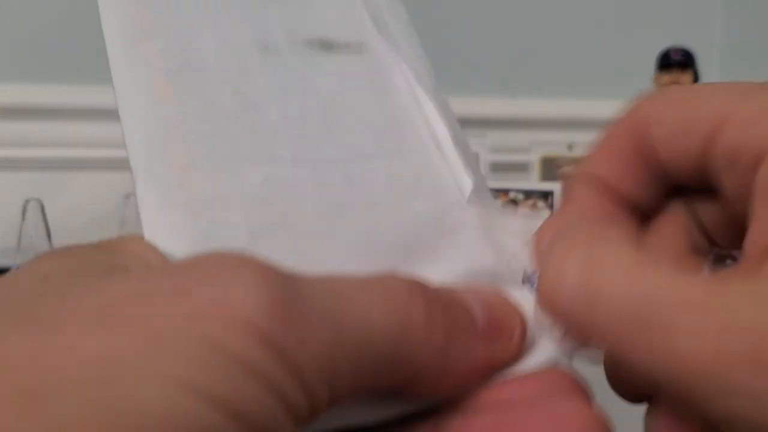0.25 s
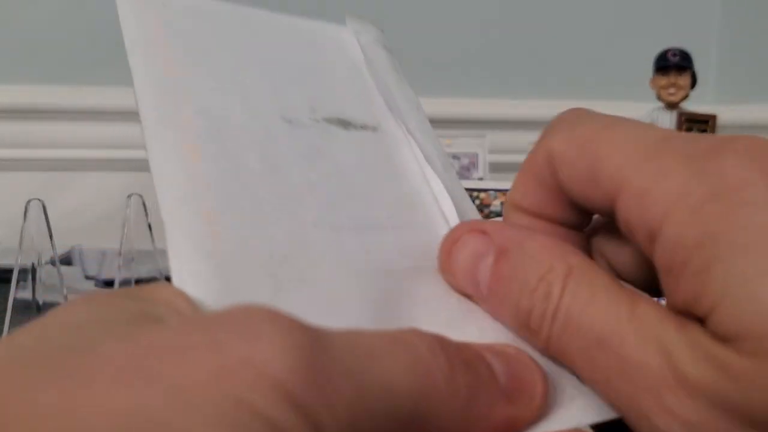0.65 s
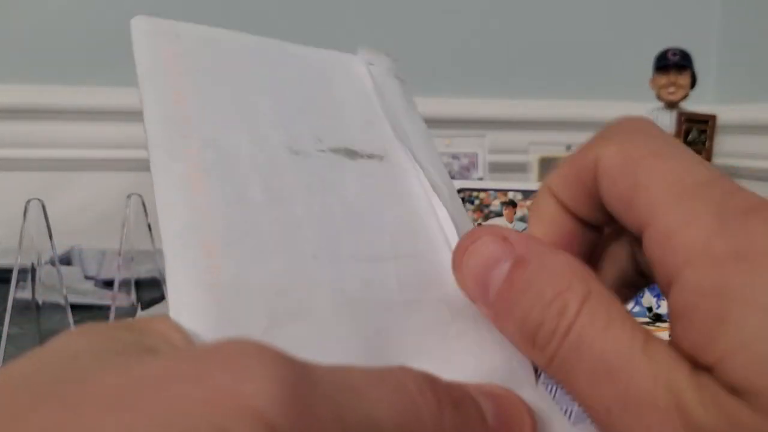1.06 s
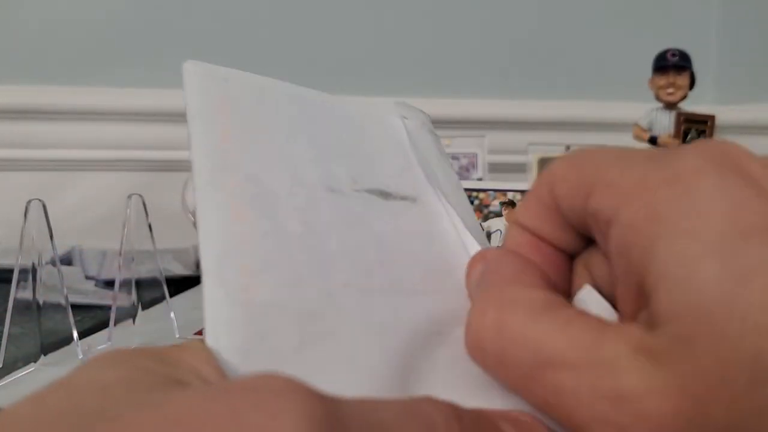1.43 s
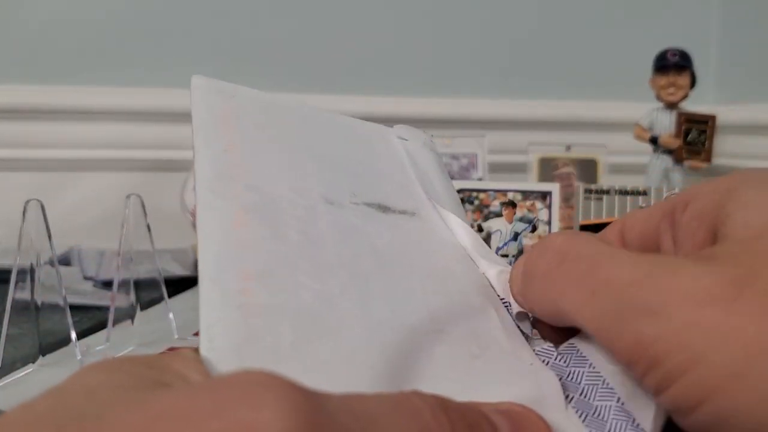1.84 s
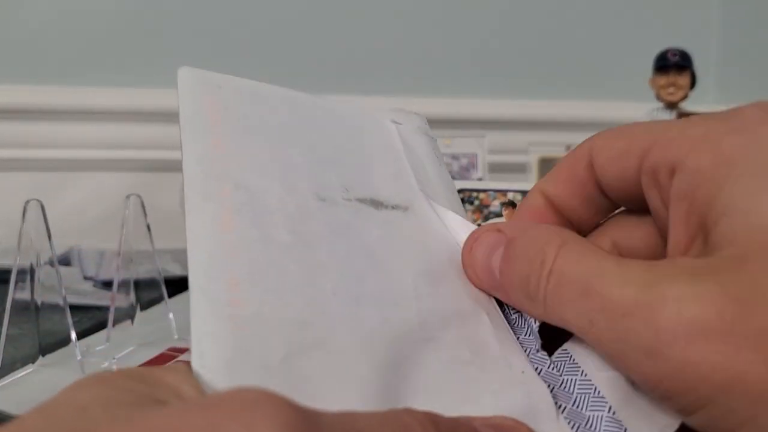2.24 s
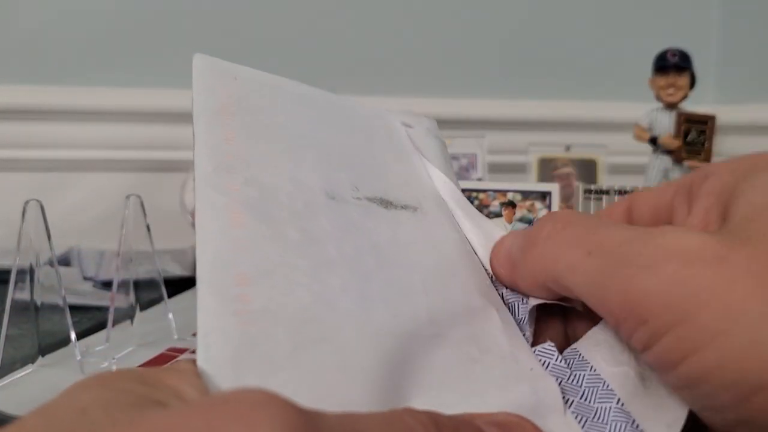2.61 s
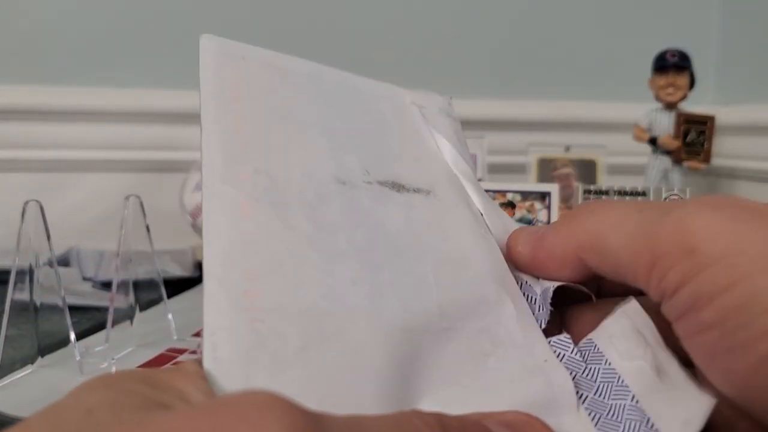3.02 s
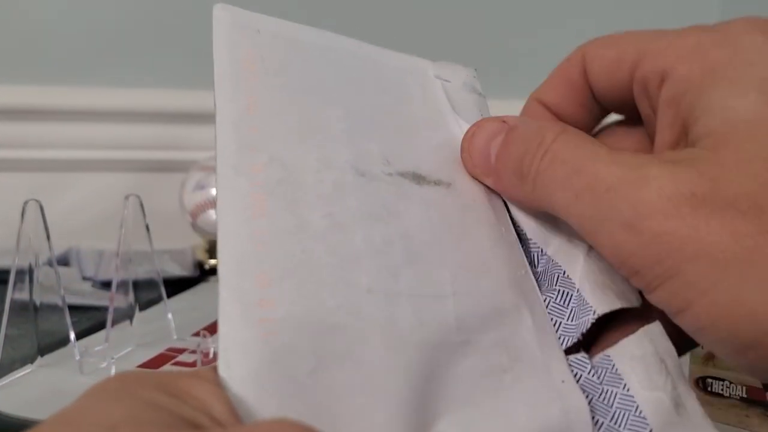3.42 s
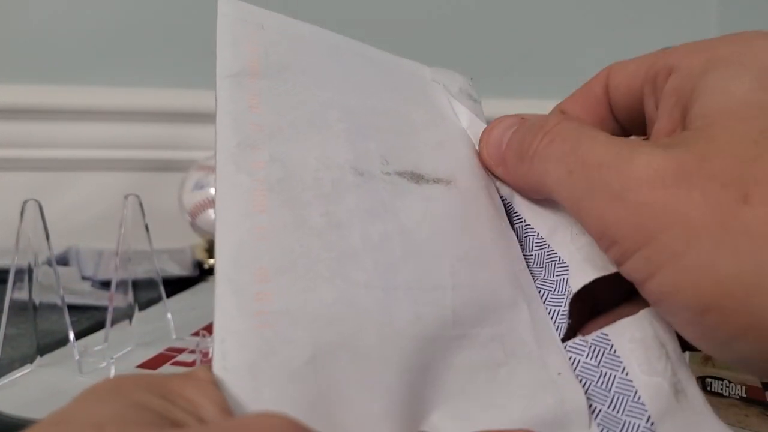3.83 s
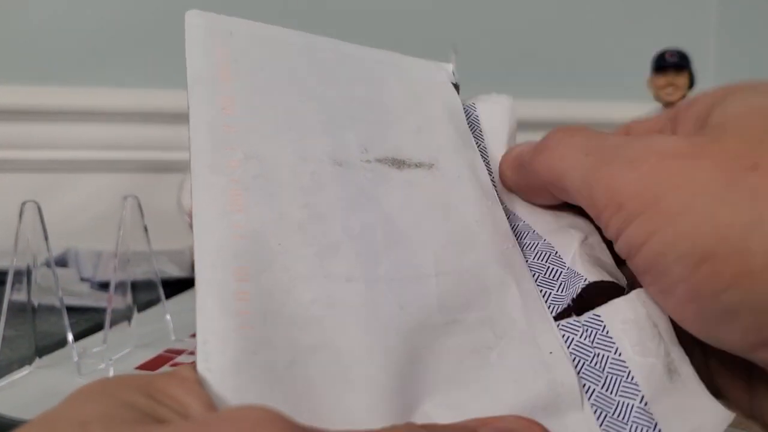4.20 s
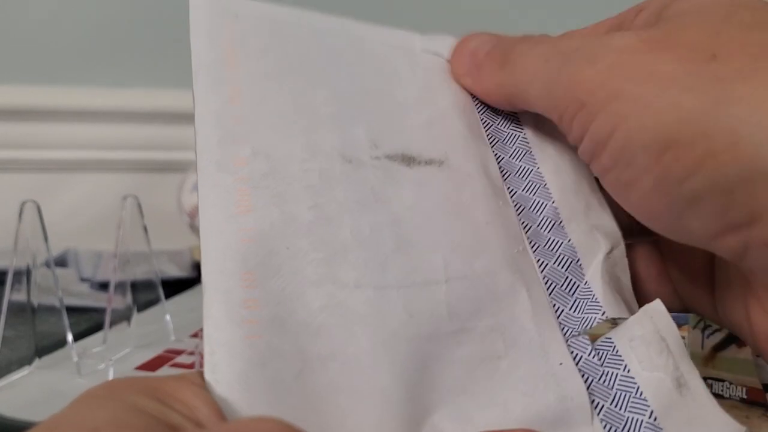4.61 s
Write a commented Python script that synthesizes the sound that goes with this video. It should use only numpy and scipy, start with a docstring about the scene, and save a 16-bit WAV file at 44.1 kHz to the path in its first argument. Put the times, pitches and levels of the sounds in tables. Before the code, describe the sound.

A thick paper envelope is torn open by hand very close to a stereo microphone in a small quiet room. A crackling rip comes early, then scattered crinkles and faint rubbing, further short rips near two and three seconds, and hard paper pops around four. Low puffs of air accompany the stronger jerks. A short room tail and soft, steady ventilation hum lie underneath.

```python
"""Hands tear a thick paper envelope open, close to a two-port microphone in a small quiet room.
Fibres rip in bursts of tiny cracks and fingers rub the sheet: noise kicks ring patches of paper.
Creases snap, each a short burst that rings flap, sheet and fibres; the moving envelope puffs low air.
Behind it, sparse reflections give the room a short tail, over a ventilation hum of shaped noise."""
import sys
import numpy as np
from scipy import signal
from scipy.io import wavfile
from scipy.ndimage import uniform_filter1d

SR = 44100
rng = np.random.default_rng(int(sys.argv[2]) if len(sys.argv) > 2 else 0)


def dump(signal):
    """Clip the signal to [-1, 1] and save it as 16-bit WAV at the path in sys.argv[1]."""
    limited = np.clip(np.atleast_2d(signal).T, -1, 1)
    pcm = np.round(limited * 32767).astype(np.int16)
    wavfile.write(sys.argv[1], SR, pcm)


N = 210004


def gain_of(db):
    """Amplitude factor for a level in dB."""
    return 10 ** (np.asarray(db) / 20)


def evened(x):
    """Scale to an rms of 1."""
    return x / np.sqrt(np.mean(x ** 2) + 1e-20)


def smoothed_twice(x, count):
    """Two moving averages in a row."""
    return uniform_filter1d(uniform_filter1d(x, size=count), size=count)


def read(points, hz):
    """Read a curve of (Hz, value) points on a logarithmic frequency axis."""
    f, value = np.transpose(points)
    return np.interp(np.log(hz + 1), np.log(f + 1), value)


def add(mix, s, sound):
    """Lay a sound into the mix from a moment in seconds."""
    part = mix[:, round(s * SR):][:, :sound.shape[1]]
    part += sound[:, :part.shape[1]]


def ring(x, hz, sharpness):
    """One damped resonance; the sharper it is, the longer it rings."""
    b, a = signal.iirpeak(min(hz, SR / 2.2), sharpness, SR)
    return signal.lfilter(b, a, x)


def band(x, lo_hz, hi_hz):
    """Keep the sound between two frequencies."""
    return signal.sosfilt(signal.butter(3, [lo_hz, hi_hz], "band", fs=SR, output="sos"), x)


def pair(z, same):
    """Left and right noise made alike by a share: 1 is identical, 0 unrelated."""
    same = np.clip(same, -1, 1)
    return np.array([z[0], same * z[0] + np.sqrt(1 - same ** 2) * z[1]])


def swells(rows):
    """Summed power of gestures that rise, hold and fall, one line for each level column."""
    ms, power = np.arange(N) / SR * 1000, 0
    for s, hold_ms, rise_ms, fall_ms, *db in rows:
        late = ms - 1000 * s
        rising = -late / max(rise_ms, 3)
        falling = (late - hold_ms) / max(fall_ms, 3)
        under_db = 20 * np.maximum(np.maximum(rising, falling), 0)
        power = power + gain_of(db)[:, None] ** 2 * gain_of(-under_db) ** 2
    return power


# Pulls and rubs of the hands, close to the microphone.
# Each row: end of the rise in seconds, hold in ms (below 0: the full level is not reached),
# rise and fall in ms for 20 dB (3 at least), then levels of fibre fizz, sheet crackle, flap flutter in dB.
STROKES = [(.113, 0, 120, 53, -53.5, -62, -70), (.183, 0, 18, 55, -51, -59, -69),
           (.281, 72, 6, 6, -37, -41.5, -51), (.321, 0.5, 81, 50, -30, -33, -42.5),
           (.4, 45, 30, 30, -60, -63, -62.5), (.458, 31, 6, 6, -47.5, -53, -61),
           (.476, 2, 48, 20, -45, -46.5, -56), (.605, 112, 12, 30, -59, -69.5, -72),
           (.748, 45, 6, 6, -50, -52.5, -66), (.758, 0, 40, 110, -53, -51, -61.5),
           (.87, 23, 6, 6, -42, -47.5, -67), (.885, 0, 55, 60, -45.5, -49.5, -56),
           (.922, 0, 45, 15, -62, -62, -44.5), (1.021, 20.5, 5.3, 6, -45, -40, -38.5),
           (1.033, 1, 90, 55, -45.5, -43, -43.5), (1.144, 0, 19, 17, -68, -55, -44.5),
           (1.17, 95, 24, 46, -57.5, -58, -64), (1.3, 57, 40, 65, -71, -71.5, -69.5),
           (1.482, 0, 76, 110, -64, -67, -64), (1.5, 87, 50, 12, -67.5, -85, -90),
           (1.603, 30, 6.7, 44, -67, -60, -57), (1.683, 21, 6, 6, -46, -48.5, -66),
           (1.724, 39, 6, 6, -36.5, -51, -55.5), (1.743, 1, 110, 66, -35, -43.5, -46.5),
           (1.865, 24, 32, 43, -55, -56, -54), (2.003, 16.5, 5.6, 5.5, -36, -43.5, -42),
           (2.012, -1, 22.5, 15, -38, -42, -36.5), (2.03, 2, 12, 73, -53, -72, -60),
           (2.223, -1, 18, 49, -56.5, -63.5, -57.5), (2.358, 9, 98, 35, -46, -52, -61),
           (2.381, -5, 12, 150, -63, -63.5, -62), (2.563, 0, 130, 12, -58, -70, -68),
           (2.572, 60, 5.4, 55, -50, -57, -57.5), (2.577, -4, 16, 24, -55, -52, -44.5),
           (2.72, 0, 62, 280, -63, -65, -62.5), (2.85, 75, 6, 6, -45, -49.5, -62),
           (2.902, 2.5, 52, 20, -36.5, -37, -47), (2.925, -2, 18, 48, -68, -47.5, -73),
           (2.99, 95, 100, 22, -61.5, -67, -79), (3.108, 24, 11, 6, -35.5, -37.5, -48.5),
           (3.12, 1, 28, 55, -37, -41, -44), (3.13, 58, 6, 6, -46, -47, -64),
           (3.192, 0.5, 10, 24, -38, -35, -35), (3.214, 0, 12, 70, -55, -62, -62),
           (3.416, 0, 18, 85, -55, -56.5, -56.5), (3.502, 30, 6, 6, -71, -53.5, -66),
           (3.515, -3, 80, 32, -71, -61, -58.5), (3.581, -1, 50, 90, -62.5, -64, -67.5),
           (3.826, 2, 130, 54, -56.5, -60.5, -65.5), (3.992, 86, 15, 28, -53.5, -56, -61),
           (4.103, 0, 10, 14, -55, -62, -30), (4.118, 0, 20, 117, -57, -49, -54),
           (4.326, 65, 31, 12, -55.5, -64, -64.5), (4.401, 1, 7.1, 15.5, -34, -38.5, -39),
           (4.42, 0, 12, 115, -58, -56.5, -62), (4.62, 24, 15, 73, -55, -63, -66),
           (4.66, 70, 22, 22, -63, -70, -75), (4.707, -1, 74, 15, -66, -45, -42),
           (4.76, 0, 25.5, 22, -38.5, -33.5, -33.5)]


def strokes():
    """Power of the hands' work on fibres, sheet and flap: the force that drives the paper."""
    return swells(STROKES)


def cracks(patch, flurry, grain, count=7):
    """Random cracks over a smooth slide, each ringing one of several patches of paper."""
    lo_hz, hi_hz, sharpness, per_s, spread_db, flurry_db, same = patch
    size_db = spread_db * np.minimum(rng.exponential(1, N), 5) + flurry_db * flurry
    starts = gain_of(size_db) * (rng.random(N) < per_s / SR)
    run = np.exp(-np.arange(24) / 5.1)  # a crack runs for a fraction of a millisecond
    hits = np.convolve(starts, run)[:N]
    # a steady pull frees energy at a steady rate
    hits = hits / np.sqrt(smoothed_twice(hits ** 2, 900) + 1e-9)
    kick = np.sqrt(grain * hits ** 2 + 1 - grain) * pair(rng.standard_normal((2, N)), same)
    which = rng.integers(0, count, N // 100 + 1).repeat(100)[:N]  # a patch drawn at random, held for 100 samples
    out = 0
    for k, hz in enumerate(np.geomspace(lo_hz, hi_hz, count)):
        share = grain * (which == k) + (1 - grain) / count  # a slide rubs all patches at once
        out = out + ring(kick * np.sqrt(share), hz, sharpness) / np.sqrt(hz)
    return evened(band(out, lo_hz * 0.75, min(hi_hz * 1.19, 20000)))


# Paper that the cracks ring: torn fibres, the sheet and the loose flap.
# Each row: lowest and highest resonance in Hz, sharpness (Q), cracks per second,
# spread of crack sizes in dB, flurry depth in dB, left-right likeness (0 to 1).
FIBRES = (5070, 19300, 1.93, 11000, 3.8, 1.3, 0.2)
SHEET = (1190, 4270, 3.2, 3900, 2.5, 2.3, 0.67)
FLAP = (361, 1046, 3.2, 1500, 2.1, 4.7, 0.85)
# The air inside the envelope: resonance in Hz, sharpness (Q), gain in dB.
POCKET = (681, 12.5, 0.8)
# The sheet turns in the hands before the microphone. Each row: time in seconds, top treble gain in dB,
# left over right in dB, ring of breaking fibres in Hz.
TURN = [(0, 8.5, -2, 12100), (.6, 1, -1, 10000), (1, 0, -2, 7960), (1.3, 2, -2, 9600),
        (1.8, 0, -4.5, 10100), (2.1, -1.5, -5, 8800), (2.5, 3, -5, 10300), (3, 3, -2, 9500),
        (3.6, 8.5, -1, 9900), (4.2, -3, -6, 9500), (4.76, -2, -2.5, 7600)]
RUB_DB, RIP_DB = -71.5, -46  # below the first level fingers slide smoothly, above the second nearly all is cracks


def tearing(power):
    """Pulls and rubs: fibres fizz, the sheet crackles, the flap flutters."""
    t = np.arange(N) / SR
    loud_db = 10 * np.log10(power[:2].sum(axis=0) + 1e-12)
    grain = np.clip((loud_db - RUB_DB) / (RIP_DB - RUB_DB), .06, .97)  # share of cracks against slide
    flurry = evened(smoothed_twice(rng.standard_normal(N), 60))  # cracks clump
    fizz, crackle, flutter = (np.sqrt(abs(p)) * cracks(patch, flurry, grain)
                              for patch, p in zip((FIBRES, SHEET, FLAP), power))
    s, top_db, pan_db, _ = np.transpose(TURN)
    top_gain = gain_of(np.interp(t, s, top_db))
    fizz = fizz + (top_gain - 1) * band(fizz, 8370, 22000)
    half_db = np.interp(t, s, pan_db) / 2
    pocket_hz, sharpness, pocket_db = POCKET
    flutter = flutter + gain_of(pocket_db) * ring(flutter, pocket_hz, sharpness)
    return (fizz + crackle) * gain_of([half_db, -half_db]) + flutter


def snap(s, flap_db, flap_hz, crack_db, crack_hz, tick_db, rise_ms, fall_ms, pan_db):
    """A crease gives way: a swelling burst of cracks rings the flap, the sheet and the fibres."""
    ms = np.arange(-300, 800) / SR * 1000
    rise_db, fall_db = 12 * ms / max(rise_ms, .1), -9 * ms / max(fall_ms, .2)
    burst = gain_of(np.where(ms < 0, rise_db, fall_db))
    z = rng.standard_normal((3, 2, len(ms))) * burst
    jolt = 2.56 * np.exp(-(ms / 0.04) ** 2)  # the fold breaks through with one sharp crack

    push = np.sin(np.pi * np.clip(ms / 1000 * flap_hz * 3.7 + .5, 0, 1))  # the sudden bulge of the flap
    flap = ring(push + 0.35 * pair(z[0], 0.99), flap_hz, 0.15)
    flap = ring(flap, flap_hz, 4.0)

    # a small crease rings one patch, a big one the whole sheet
    sharpness = np.clip(-.09 * (crack_db + 9), .7, 4.5)
    crack = ring(pair(z[1], 0.74) + jolt, crack_hz, 0.51)
    crack = ring(crack, crack_hz, sharpness) + 0.23 * crack

    tick_hz = np.interp(s, *np.transpose(TURN)[[0, -1]])
    tick = ring(band(pair(z[2], 0.4) + 0.6 * jolt, 5160, 18700), tick_hz, 0.97)

    # bring the loudest short stretch of each part to 1 (window in samples)
    flap, crack, tick = (part / np.sqrt(uniform_filter1d(part.mean(axis=0) ** 2, count).max())
                         for part, count in ((flap, 130), (crack, 66), (tick, 44)))
    treble = gain_of(crack_db) * crack + gain_of(tick_db) * tick
    # long waves reach both ports alike; the phone body shades only the treble
    sides = gain_of([[pan_db / 2], [-pan_db / 2]])
    return s - 300 / SR, gain_of(flap_db) * flap + treble * sides


# Small creases at random moments, standing above the stroke under way.
# The row: level above the stroke in dB, spread either way in dB, rise in ms for 12 dB, fall in ms for 9 dB.
SMALL = (6.7, 3, 2.3, 2.8)


def small_snaps(power, count=45):
    """Rows for small creases: random moments and patches, as strong as the stroke allows."""
    above_db, spread_db, rise_ms, fall_ms = SMALL
    for when, low, mid, a, b, c, side in rng.random((count, 7)):
        at = int(400 + when * (N - 400))
        stroke_db = 10 * np.log10(power[:, at] + 1e-12)
        tick_db, crack_db, flap_db = stroke_db + above_db + spread_db * (2 * np.array([a, b, c]) - 1)
        flap_hz = FLAP[0] * (FLAP[1] / FLAP[0]) ** low
        crack_hz = SHEET[0] * (SHEET[1] / SHEET[0]) ** mid
        yield at / SR, flap_db, flap_hz, crack_db, crack_hz, tick_db, rise_ms, fall_ms, 8 * side - 5


# Creases that buckle close to the microphone. Each row: peak in seconds, flap level in dB, flap ring in Hz,
# crack level in dB, crack ring in Hz, tick level in dB, rise in ms for 12 dB, fall in ms for 9 dB,
# left over right in dB.
SNAPS = [(.0303, -57, 360, -55, 2285, -55, 1.2, 2.4, -5), (.105, -68, 590, -58, 3700, -43, 0.64, 1, 0),
         (0.1112, -63, 590, -51, 3730, -32, .5, 0.81, 0), (.1281, -65, 440, -49.5, 2810, -58, 2.2, 2.4, 0),
         (0.183, -69, 310, -46, 3370, -31.5, .5, .5, -1), (0.1972, -66, 310, -43.5, 3620, -38, .7, 1.5, -2),
         (.206, -66, 840, -39, 3360, -30.5, .4, 0.47, -3),
         (0.2348, -33.5, 1050, -29, 1610, -44, 0.26, 2.1, 4),
         (.2432, -59, 1070, -39, 2210, -40, 0.94, 3, -2), (.2676, -49, 710, -56, 3270, -42, 2.6, 3.3, 4),
         (0.2774, -40, 540, -33, 2060, -38, 2.4, 4.1, 3), (.2845, -45, 700, -32.5, 2500, -35, .5, 1.5, 0),
         (0.3138, -36, 1090, -27, 1720, -35, 1.3, 4, -1.5),
         (.325, -31, 530, -23, 2230, -32.5, 0.49, 8.9, 4.5),
         (.3607, -33.5, 750, -37, 2040, -44, 3.9, 7.3, -8),
         (0.5104, -43, 570, -42.5, 1220, -64, 1.1, 1.6, 2), (.7856, -52, 1040, -33, 2030, -45, 1.2, 1.7, 1),
         (0.8904, -47, 630, -29, 2100, -31.5, 1.1, 1.6, -2.5),
         (.9149, -36.5, 660, -39, 1580, -51, 2.4, 3.1, 1),
         (.9211, -48, 720, -39.5, 3900, -32, 2.9, 3.1, -1),
         (1.0316, -24.5, 660, -27.5, 2620, -42, 4.1, 5.2, -2),
         (1.0593, -33, 720, -28, 2980, -34, 2, 2.3, 2), (1.08, -48, 590, -53, 3360, -53, 2.2, 2.3, -2),
         (1.1282, -61, 650, -54, 2550, -49, 2, 3, -1), (1.1539, -48, 640, -55, 2360, -60, 1.7, 2.1, -3),
         (1.1421, -45, 630, -42, 2900, -45, 1.2, 3.9, 1),
         (1.1748, -46.5, 660, -49, 3310, -48, .75, 2.2, -4),
         (1.3085, -58, 300, -62, 1840, -48.5, 2.2, 2.2, -6.5),
         (1.3576, -54.5, 880, -54, 1290, -52.5, 0.76, 1.3, 0),
         (1.482, -48.5, 1150, -48.5, 1400, -70, 0.76, 1.43, 3),
         (1.6011, -36.5, 720, -28.5, 1640, -29, 1.2, 1.3, -2),
         (1.6177, -43, 880, -37, 1570, -53, .5, 1.1, -1), (1.6423, -67, 440, -50, 1930, -44, 2.2, 1.7, -5),
         (1.6736, -42.5, 685, -39, 1740, -56, 2.2, 3.6, -2),
         (1.6948, -41.5, 603, -47, 3730, -28.5, 2, 2.6, -3.5),
         (1.7305, -38.5, 700, -36.5, 2470, -28, 3.9, 6.9, -1),
         (1.7463, -43, 534, -35.5, 2370, -25, 3.2, 4.8, 4),
         (1.7741, -51, 560, -57, 2010, -28, .6, 1.9, 3.5),
         (1.8016, -42.5, 710, -42.5, 1730, -50, 3.2, 3.2, 0),
         (1.8196, -43, 830, -40.5, 1430, -49, .6, .9, 1), (1.838, -70, 420, -45.5, 4210, -40, .6, 1, -1),
         (1.8646, -36, 700, -35.5, 1500, -55, 1, 2.2, -5),
         (1.8834, -66, 650, -57, 3400, -39.5, .7, 1.1, -4),
         (1.9658, -56, 310, -63, 2910, -48, 3.4, 1.3, -1),
         (1.9883, -41, 600, -29.5, 3260, -23.5, 0.38, 0.94, 2.5),
         (1.9967, -53, 490, -37.5, 4260, -39, 1.2, 2.3, -5),
         (2.008, -35.5, 694, -32.5, 2500, -26, 0.67, 2, -2),
         (2.014, -28.5, 710, -34, 1820, -32, 1.5, 1.6, 1),
         (2.0224, -42.5, 370, -40, 1720, -55, 1.7, .8, -9), (2.27, -52, 450, -57, 3640, -40.5, .5, 1.4, 0),
         (2.2795, -68, 380, -64, 2310, -46, 1.8, 2.7, 2), (2.3042, -59, 430, -45, 5200, -36, 1, .98, 1),
         (2.3148, -38, 610, -42.5, 1270, -42.5, 1.7, 5.3, 2),
         (2.3209, -53, 440, -49, 4840, -47, 1.6, 1.4, -2),
         (2.3504, -71, 560, -60, 3010, -32.5, 0.56, 1, -7),
         (2.357, -44.5, 580, -40, 2900, -26.5, 2.1, 1.8, 1),
         (2.431, -52, 334, -58, 1580, -65, 2.1, 1.9, -2),
         (2.4945, -74, 310, -59, 4740, -52.5, 2.6, 3.7, -2),
         (2.578, -49, 320, -37, 3870, -27, 0.74, 3.1, -3), (2.6009, -65, 480, -61, 4520, -37, 2.4, 3.2, 0),
         (2.6151, -49, 613, -33, 3400, -28, .66, 2.2, -4.5),
         (2.6222, -41, 557, -37.5, 3070, -49, 2.2, 4, 1), (2.6494, -47, 435, -53, 3020, -55, 2.2, 3.7, -10),
         (2.706, -46, 600, -60, 1540, -65, 1, 2.1, 2), (2.7298, -48, 616, -55, 1250, -55, 1, 2.4, 0),
         (2.7741, -61, 400, -61, 1590, -52, 1.5, 2, 0), (2.8259, -66, 780, -62, 1550, -54, 1, 2, -1),
         (2.8098, -67, 290, -64, 2830, -48, 3.1, 1, -1), (2.8464, -53, 990, -41.5, 1330, -44, .9, 1.4, 0),
         (2.852, -54, 1090, -58, 1910, -39, 1, 1.4, 3), (2.8746, -59, 1010, -41, 3280, -36, .34, .77, 9),
         (2.8985, -41.5, 1040, -32.5, 2960, -50, 1.9, 0.73, -4),
         (2.9047, -40, 625, -41, 1730, -31, 1.9, 4, -1), (2.9373, -65, 930, -38, 4000, -42, .52, 0.65, -4),
         (3.0247, -76, 460, -55.5, 2790, -53, 2.8, 3.3, -4),
         (3.1305, -49, 383, -42, 1590, -45, 2.2, 3.3, -2),
         (3.1447, -41.5, 530, -37, 3260, -42, 2.2, 3.4, -2),
         (3.1525, -58, 300, -41, 3340, -41, 1.2, 3.3, -2), (3.162, -62, 490, -50, 2830, -35.5, 1, 3.7, 0),
         (3.19, -34, 800, -20, 3750, -20.5, .5, 1.54, 0.5),
         (3.2041, -52, 750, -32.5, 1760, -41, .7, 3.3, -7),
         (3.4114, -51, 520, -50, 3710, -48.5, 2.4, 1.5, -3),
         (3.4305, -57, 460, -61, 2800, -47, 2.4, 2.5, -1), (3.5064, -56, 1120, -44, 1630, -58, 2.2, 9, 1),
         (3.5259, -61, 610, -50, 2020, -57, 1.5, 1.9, 2), (3.579, -49, 577, -66, 2260, -51.5, 3, 1.4, 3),
         (3.7194, -60, 290, -47, 3600, -73, .5, 1.5, -2),
         (3.7937, -64, 350, -47.5, 3220, -47, 0.74, 1.2, 0),
         (3.9888, -23, 650, -22, 2400, -28, 0.49, 1.5, -5),
         (3.9977, -45, 590, -45, 3180, -38, 1.6, 2.4, -9),
         (4.0973, -19.5, 692, -15.5, 2250, -23, 0.88, 2.3, -1.5),
         (4.2378, -54, 480, -62, 3280, -59, 2.2, 3.1, -7), (4.2445, -56, 740, -60, 3780, -52, 1.2, 2.3, -6),
         (4.323, -48.5, 530, -71, 3450, -48, 3.2, 2.5, -4),
         (4.4013, -32, 874, -22.5, 2220, -19.5, 3, 1.1, -5),
         (4.4099, -41, 685, -34, 3670, -50, 2.8, 2.1, 0),
         (4.6516, -43.5, 664, -35, 1890, -61, 0.96, 3.2, 0),
         (4.674, -38.5, 470, -43, 1350, -70, .7, 3.5, 0), (4.6852, -48, 570, -34, 1810, -54, .89, 1.6, -5),
         (4.7007, -55, 510, -36, 1800, -56, 3.1, 1, 3), (4.7119, -45, 770, -38, 1400, -57, 2.4, 3.2, -5),
         (4.7425, -37, 766, -23, 2850, -31.5, 2.1, 2.5, -1),
         (4.7563, -49, 700, -27, 1640, -45, 0.89, 1.7, -2)]


def add_snaps(paper, power):
    """Lay the listed creases and the small random ones over the tearing."""
    for row in SNAPS + list(small_snaps(power)):
        add(paper, *snap(*row))


# The whole envelope pumps air when it is jerked. Each row: peak in seconds, rise and fall in ms for 20 dB,
# deep puff level in dB, shallow puff level in dB.
PUMPING = [(.02, 300, -55.5, -66), (.34, 156, -46.5, -48), (.75, 250, -62, -69), (.92, 90, -50, -53),
           (1.048, 50, -41, -41), (1.17, 70, -54, -52.5), (1.31, 80, -56, -63), (1.47, 120, -59, -62),
           (1.74, 200, -53, -56), (1.91, 120, -61, -64), (2.03, 130, -63, -54), (2.21, 110, -58, -64),
           (2.4, 800, -62, -64.5), (2.92, 130, -60, -57.5), (3.12, 110, -57, -51), (3.21, 100, -45.5, -54),
           (3.43, 200, -60, -57.5), (3.58, 170, -57.5, -67.5), (3.83, 250, -57.5, -59.5),
           (3.99, 130, -61, -56.5), (4.1, 42, -40, -43.5), (4.17, 90, -51.5, -54.5),
           (4.41, 116, -50.5, -47.5), (4.71, 150, -54, -47), (4.76, 250, -53, -58)]


def pumping():
    """Low puffs of air from the moving envelope: two bands of noise that swell with each jerk."""
    deep, shallow = np.sqrt(swells([(s, 0, ms, ms, *db) for s, ms, *db in PUMPING]))
    air = pair(rng.standard_normal((2, N)), 0.89)
    return deep * evened(band(air, 48, 91.7)) + shallow * evened(band(air, 119, 265))


# The small room's decay. Each row: frequency in Hz, time to die by 60 dB in seconds.
ROOM_T60 = [(200, 0.28), (700, 0.28), (2000, 0.25), (5000, 0.24), (12000, 0.22)]
# Colour of the tail at its start. Each row: frequency in Hz, level in dB.
ROOM_TILT = [(200, -4), (1000, -6), (4000, 1), (12000, 1)]
# How alike room and hum reach the two ports. Each row: frequency in Hz, left-right likeness (0 to 1).
LIKENESS = [(60, 0.97), (640, 0.64), (2000, 0.1), (6000, 0.011)]
ROOM_DB = -8  # tail against the paper


def tail():
    """Sparse reflections of random sign, each band dying at its own speed."""
    taps, starts = np.zeros((2, SR // 2)), np.arange(200, SR // 2 - 10, 10)
    at = starts + rng.integers(0, 10, (2, len(starts)))
    np.put_along_axis(taps, at, rng.choice([-1., 1.], at.shape), 1)
    hz, t, z = signal.stft(taps, SR, nperseg=256)
    z = pair(z, read(LIKENESS, hz)[:, None])
    decay_db = read(ROOM_TILT, hz)[:, None] - 60 * t / read(ROOM_T60, hz)[:, None]
    out = signal.istft(z * gain_of(decay_db), SR, nperseg=256)[1]
    out[:, :200] = 0  # silent until the first reflection
    return out / np.linalg.norm(out[0])


def room(x, rotation_hz=750):
    """The treble passes through three tails in rotation, which blurs its colour; the low part goes to all alike."""
    low = signal.lfilter(*signal.butter(2, 1200, fs=SR), x)
    angle = np.pi * rotation_hz * np.arange(N) / SR
    out = 0
    for k in range(3):
        treble = (x - low) * np.sqrt(2 / 3) * np.cos(angle + k * np.pi / 3)
        way = treble + low / np.sqrt(3)
        out = out + signal.fftconvolve(way[None], tail(), axes=1)[:, :N]
    return out


# Ventilation rumble with two room resonances. Each row: frequency in Hz, relative density in dB per Hz.
HUM = [(18, -46), (30, -31), (70, 11), (120, -29), (160, -14), (190, -11.5), (250, 4.5), (330, -19.5),
       (485, -3.5), (570, -22.5), (750, -23.5), (1000, -28), (2200, -29.5), (7000, -34), (16000, -36)]
HUM_DB = -59  # rms before the microphone


def hum():
    """Steady low noise, shaped in frequency, with slightly drifting patches."""
    frames, hz = N // 512 + 5, np.fft.rfftfreq(2048, 1 / SR)
    a, b, c, d, patches = rng.standard_normal((frames, 1025, 5)).T
    patches = uniform_filter1d(uniform_filter1d(patches, size=5, axis=0), size=8, axis=1)
    z = pair([a + 1j * b, c + 1j * d], read(LIKENESS, hz)[:, None])
    z = z * gain_of(read(HUM, hz)[:, None] + 1.2 * evened(patches))
    noise = signal.istft(z, nperseg=2048, noverlap=1536)[1][:, :N]
    return gain_of(HUM_DB) * evened(noise)


PORT_LAG = 2  # samples by which the right port hears the paper later


def scene():
    """The torn envelope, its echo in the room, the puffs of air and the hum."""
    power = strokes()
    paper = tearing(power)
    add_snaps(paper, power)
    paper[1] = np.roll(paper[1], PORT_LAG)
    return paper + gain_of(ROOM_DB) * room(paper.mean(axis=0)) + pumping() + hum()


# Response of the microphone port. Each row: frequency in Hz, gain in dB.
MIC = [(100, 0.06), (1700, 0.63), (2600, -3), (4000, 2), (5000, -0.1), (6500, -1), (7600, -2), (8800, 6.5),
       (11000, 2.5), (15500, 1.5)]
EDGE_HZ = 15750  # upper band limit


def record(dry):
    """The microphone port dips and peaks in the treble; then the band limit; the first instant fades in."""
    hz = np.linspace(0, SR / 2, 257)
    port = signal.firwin2(255, hz, gain_of(read(MIC, hz)), fs=SR)
    edge = signal.firwin(511, EDGE_HZ, window=("kaiser", 9), fs=SR)
    opening = np.minimum(np.arange(N) / (.006 * SR), 1)  # 6 ms
    return opening * signal.oaconvolve(dry, np.convolve(port, edge)[None], "same")


dry = scene()
out = record(dry)
dump(out)
```